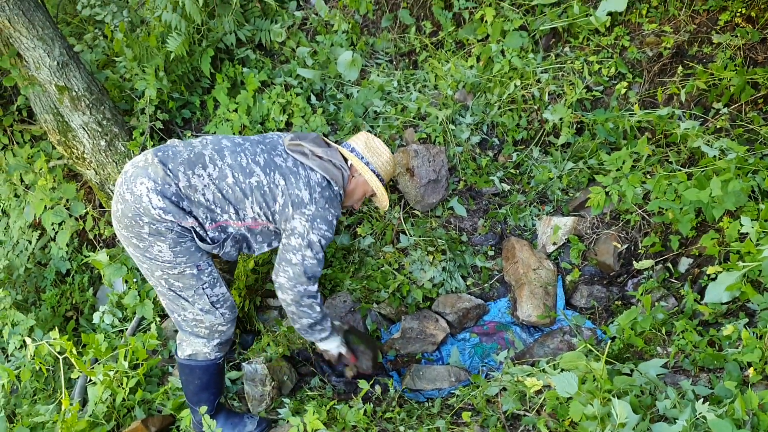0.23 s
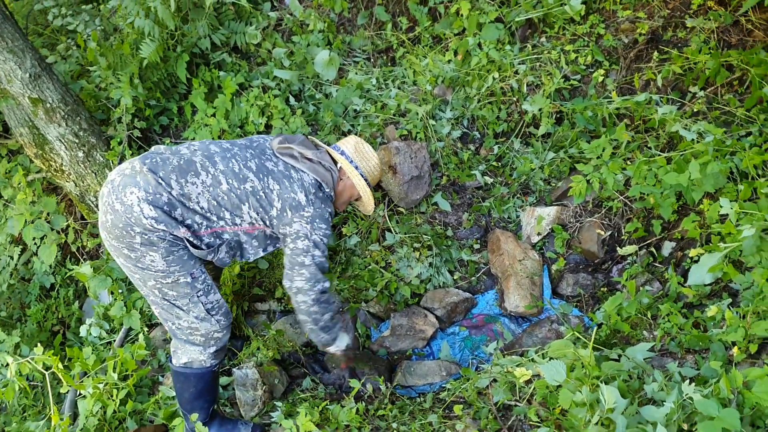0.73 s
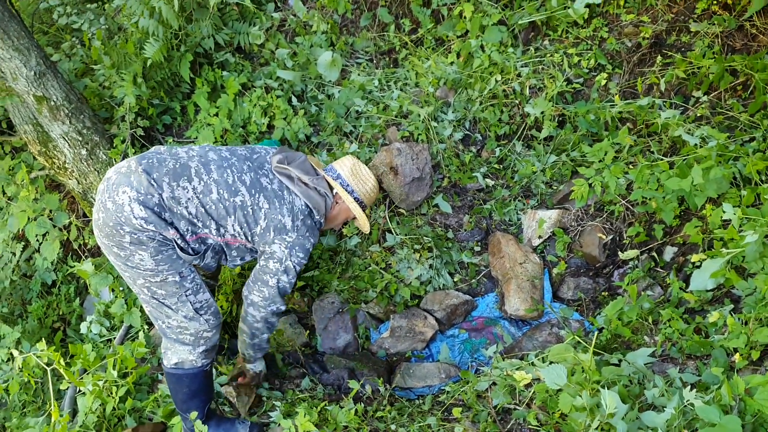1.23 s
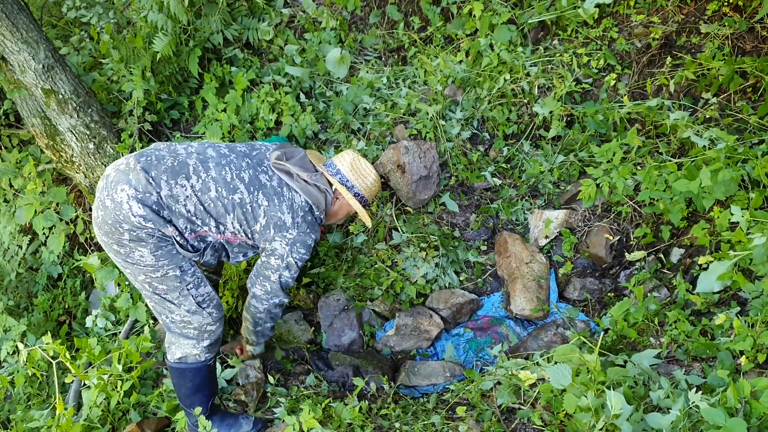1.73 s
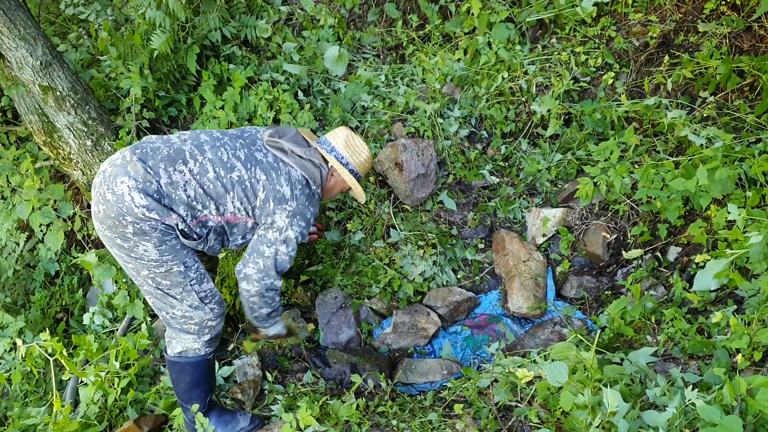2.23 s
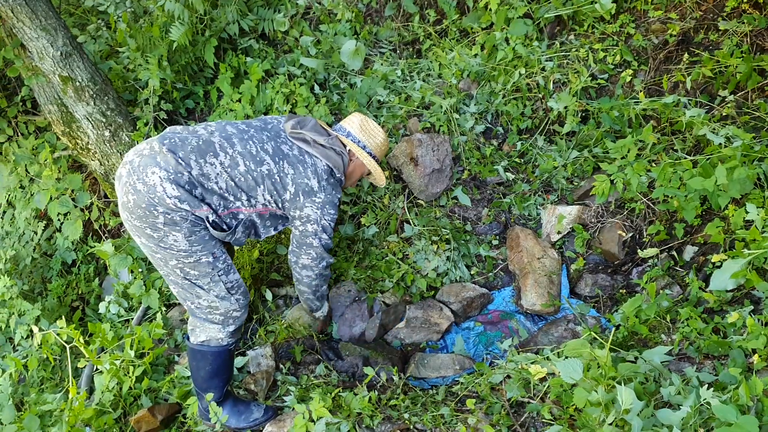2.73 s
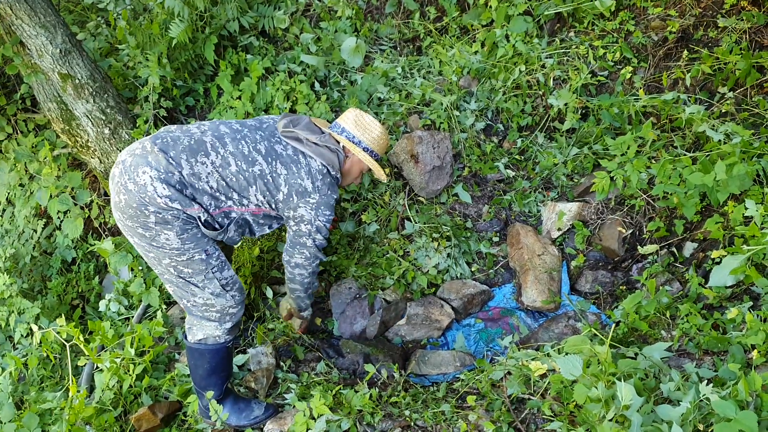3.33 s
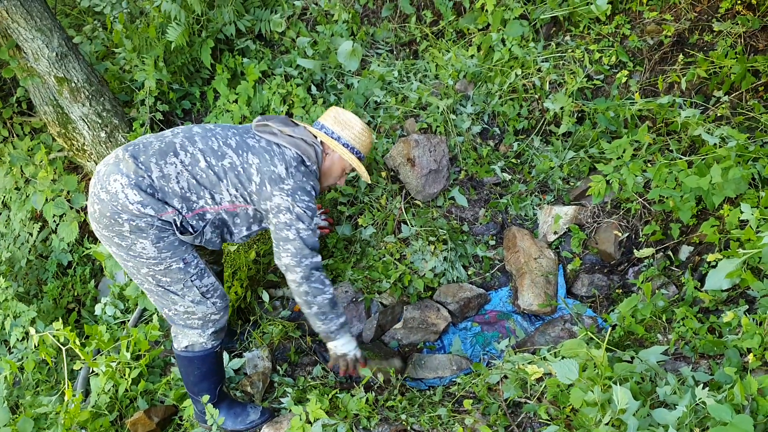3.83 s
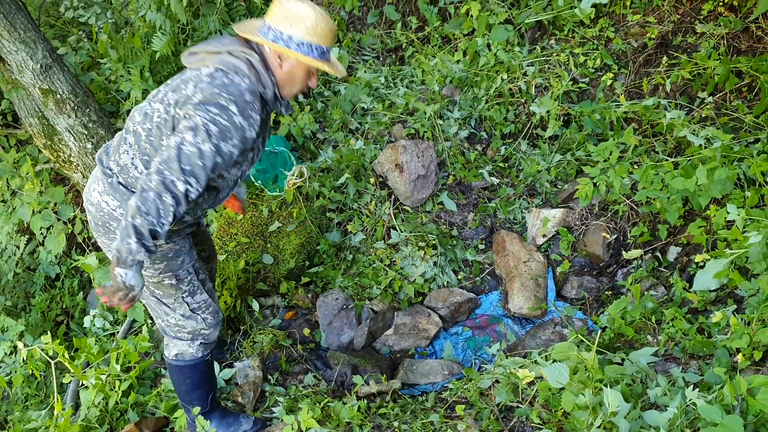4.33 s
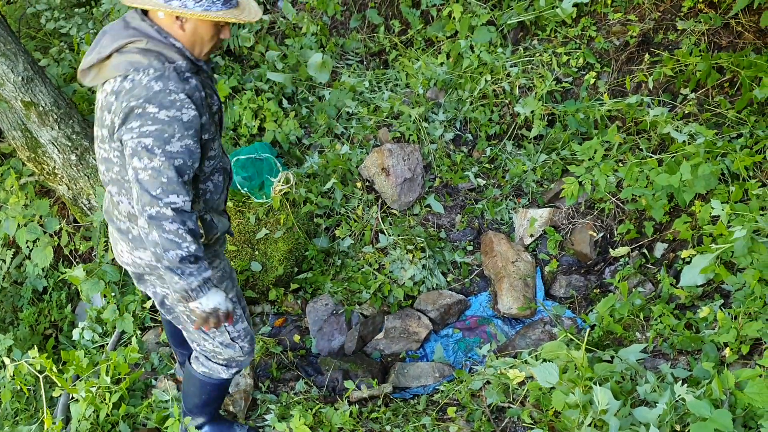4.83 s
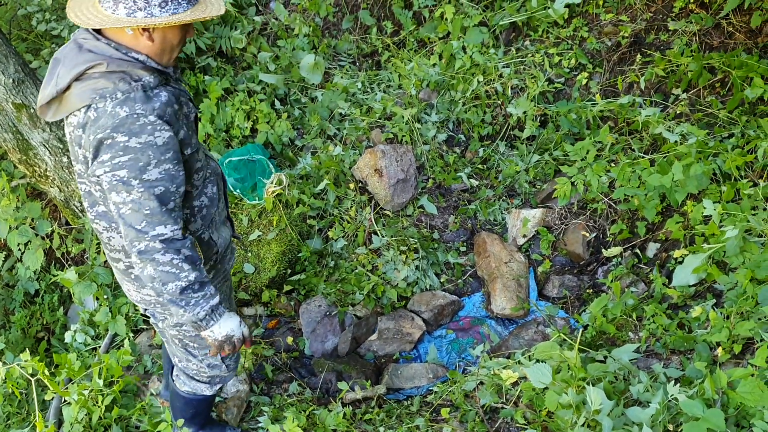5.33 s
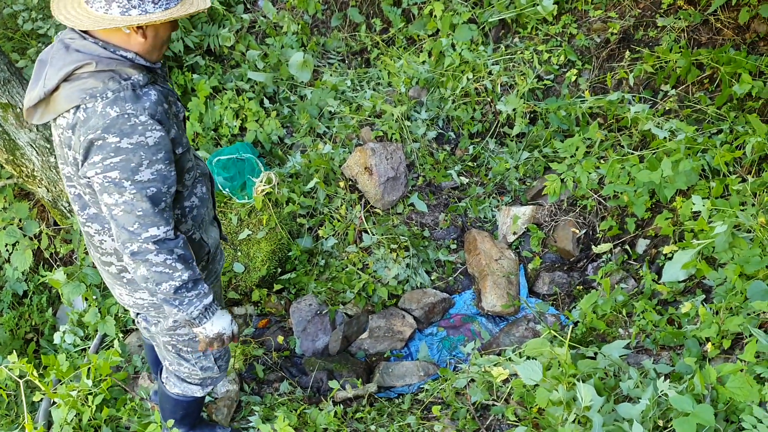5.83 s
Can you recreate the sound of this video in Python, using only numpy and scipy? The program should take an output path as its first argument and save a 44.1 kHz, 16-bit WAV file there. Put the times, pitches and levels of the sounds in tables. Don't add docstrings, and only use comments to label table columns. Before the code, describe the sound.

Stones being handled a few metres from a stereo microphone outdoors: a quick crunchy tumble, soft knocks with sleeves and leaves rustling, a loud bright stone-on-stone crack with a brief rattle, then a deeper double clunk into grit and earth. Afterwards it grows quieter, with faint movement and sparse light taps. Throughout, short piercing bird whistles come from the left, with distant engine rumble beneath.

```python
import sys
import numpy as np
from scipy import signal
from scipy.fft import rfft, irfft, next_fast_len
from scipy.io import wavfile
from scipy.ndimage import uniform_filter1d

SR = 44100
rng = np.random.default_rng(int(sys.argv[2]) if len(sys.argv) > 2 else 0)


def generate_wav(sig):
    pcm = np.round(np.clip(np.atleast_2d(sig).T, -1, 1) * 32767).astype(np.int16)
    wavfile.write(sys.argv[1], SR, pcm)


def undo_db(level):
    steps = np.asarray(level, float) / 20
    return 10 ** steps


N = 268789
T = np.arange(N) / SR
CRACK_S = 2.5719


def sides(pan_db):
    return undo_db(np.array([[.5], [-.5]]) * pan_db)


def unit(x):
    return x / np.sqrt(np.mean(x ** 2))


def highpass(x, order, hz):
    return signal.sosfilt(signal.butter(order, hz, "high", fs=SR, output="sos"), x)


def band(x, hz, width_hz):
    return signal.lfilter(*signal.iirpeak(hz, hz / width_hz, fs=SR), x)


def band_twice(x, hz, width_hz):
    return band(band(x, hz, width_hz), hz, width_hz)


def body(x, modes):
    return sum(undo_db(db) * band(x, hz, width_hz) for hz, width_hz, db in modes)


def decay(t, t60_s):
    return 1000. ** (-t / t60_s)


def ring(hz, t60_s, push_s):
    t = T[:SR // 6]
    push = np.hanning(int(push_s * SR) + 3)
    mode = np.sin(2 * np.pi * hz * t) * decay(t, t60_s)
    return np.convolve(mode, push / push.sum())[:len(t)]


def glide(hz):
    return 2 * np.pi * np.cumsum(hz) / SR


def add(out, s, sound):
    i = int(s * SR)
    out[..., i:i + sound.shape[-1]] += sound[..., :N - i]


def walk(rate_hz):
    k = int(SR / rate_hz)
    held = np.repeat(rng.standard_normal(N // k + 1), k)
    return 1.335 * uniform_filter1d(uniform_filter1d(held, k), k)[:N]


def swells(table, column):
    power = 0
    for row in table:
        angle = np.pi * np.clip((T - row[0]) / row[1] / 1.5, -.5, .5)
        power = power + undo_db(2 * row[column]) * np.cos(angle) ** 4
    return np.sqrt(power)


def grains(per_s, spread_db, shared):
    hit = rng.random((3, N)) < per_s / SR
    size = undo_db(spread_db * rng.exponential(size=(3, N))) * rng.standard_normal((3, N)) * hit
    return np.sqrt(shared) * size[0] + np.sqrt(1 - shared) * size[1:]


def wood(x, t60_s):
    t = T[:SR]
    tail = rng.standard_normal((2, SR)) * decay(t, t60_s) * np.clip(t / 0.0039, 0, 1)
    tail = tail / np.sqrt((tail ** 2).sum(axis=1, keepdims=True))
    return signal.fftconvolve(x.mean(axis=0)[None], tail, axes=1)[:, :N]


# frequency in Hz, level in dB per Hz.
AIR = [(18, -28.5), (30, -2.5), (71, -6.5), (120, -13), (249, -6.5), (341, -10), (518, -5.5), (747, -12.5),
       (1360, -15), (1910, -13.5), (3400, -25.5), (7650, -27), (8950, -42), (11900, -33), (15500, -33.5)]
# frequency in Hz, left-right correlation.
LIKENESS = [(60, 0.88), (130, 0.93), (290, 0.79), (640, 0.65), (1410, 0.33), (3100, 0), (6820, 0.19),
            (15000, 0.0)]
# frequency in Hz, left minus right in dB.
LEAN = [(60, -1.5), (110, -2), (200, -2.5), (380, 0.5), (700, -0.5), (1290, 1.5), (2380, 3.5), (4400, 4),
        (8120, 8), (15000, -1)]
AIR_DB, AIR_LAG_S = -55.5, .00038


def air():
    size = next_fast_len(N)
    octave = np.log2(np.maximum(np.arange(size // 2 + 1) * SR / size, 1))

    def read(table):
        hz, value = np.transpose(table)
        return np.interp(octave, np.log2(hz), value)

    mid, side = rfft(rng.standard_normal((2, size)))
    likeness = np.clip(read(LIKENESS), -.9, .99)
    side = np.sqrt(1 - likeness) * side * np.array([[1], [-1]])
    pair = undo_db(read(AIR)) * sides(read(LEAN)) * (np.sqrt(1 + likeness) * mid + side)
    pair = pair * np.exp(-2j * np.pi * 2 ** octave * AIR_LAG_S * np.array([[0], [1]]))
    out, swell = 0, walk(0.24)
    for centre in np.arange(4, 14.6, .5):
        share = np.clip(1 - 2 * np.abs(octave - centre), 0, 1)
        out = out + undo_db(0.41 * swell + walk(8.8)) * irfft(share * pair, size)[:, :N]
    return undo_db(AIR_DB) * unit(out)


# time in seconds, pitch in Hz, level in dB.
DRONE = [(0, 68.6, -66), (.25, 69.1, -68), (.5, 67.9, -70), (.65, 68.2, -63), (1.15, 68.1, -67),
         (1.7, 68, -62.5), (2.0, 67.7, -57), (2.45, 67.9, -55.5), (2.7, 68.1, -56.5), (3.3, 67.4, -62.5),
         (3.7, 68.4, -65), (4.05, 68.2, -64.5), (4.4, 67.9, -58), (4.75, 62.9, -62.5), (5.05, 68, -63),
         (5.31, 67.8, -55.5), (5.7, 63.1, -67.5), (6.09, 63, -71)]


def drone():
    s, hz, db = np.transpose(DRONE)
    line = np.sin(glide(np.interp(T, s, hz) * (1 + 0.0297 * walk(6.5))))
    return undo_db(np.interp(T, s, db) + 3.5 + 3.2 * walk(6.0)) * line


# middle in seconds, length in seconds, growl in dB, rumble in dB.
PASSES = [(.05, 0.39, -65.5, -65), (.8, 1, -70, -77), (1.4, 0.77, -72, -64), (2.35, 0.47, -61.5, -61),
          (2.75, 0.56, -62, -63), (3.3, 1, -63, -77), (4.6, 1, -63, -61), (5.3, 0.46, -60, -59),
          (5.75, 0.81, -65, -65)]
PASS_WAVER_DB = 2.5


def traffic():
    growl = unit(band_twice(rng.standard_normal(N), 261, 112))
    growl = swells(PASSES, column=2) * undo_db(PASS_WAVER_DB * walk(5.4)) * growl
    rumble = unit(band_twice(rng.standard_normal(N), 41, 30))
    rumble = swells(PASSES, column=3) * undo_db(PASS_WAVER_DB * walk(6.9)) * rumble
    return growl + rumble


# time in seconds, pitch in Hz, level in dB.
SLURS = [
    [(2.09, 4060, -88), (2.15, 4030, -75), (2.25, 3890, -70), (2.305, 3795, -67), (2.335, 3830, -62),
     (2.36, 3930, -70), (2.385, 3900, -77), (2.42, 3850, -86)],
    [(3.47, 4420, -88), (3.50, 4400, -71), (3.55, 4400, -71), (3.6, 4400, -76), (3.64, 4330, -88),
     (3.67, 4280, -71), (3.71, 4115, -75), (3.76, 4100, -73), (3.79, 4050, -86)],
    [(4.46, 5050, -80), (4.47, 4950, -66), (4.485, 4750, -68), (4.497, 4800, -68), (4.51, 4850, -85)],
]
SLUR_OVERTONE_DB = [-7, -17, -30]


def far_bird():
    out = np.zeros((2, N))
    for slur, over_db in zip(SLURS, SLUR_OVERTONE_DB):
        s, hz, db = np.transpose(slur)
        phase = glide(np.interp(T, s, hz))
        size = undo_db(np.interp(T, s, db) + 1.5 * walk(29.9)) * (T > s[0]) * (T < s[-1])
        out += sides(3.0) * size * (np.sin(phase) + undo_db(over_db) * np.sin(2 * phase))
    return out


# start in seconds, level in dB, start pitch in Hz, fall in percent of pitch,
# place of the hook as share of length.
WHISTLES = [(.03, -73, 5180, 1.6, .6), (.444, -56, 5164, 2.57, 0.695), (.660, -64, 5060, 1.76, 0.36),
            (.705, -63, 5040, 1, .3), (1.456, -57.5, 5120, 5, 0.56), (1.945, -60, 5050, 1.9, 0.22),
            (2.238, -55.5, 5160, 2.5, 0.7), (2.977, -56.5, 5153, 3, 0.72), (3.458, -63, 5040, 1.45, 0.27),
            (3.673, -57, 5145, 2.9, 0.65), (4.446, -56.5, 5155, 2.34, 0.64),
            (4.995, -67.5, 5090, 1.6, 0.44), (5.176, -56.5, 5150, 2.7, 0.65),
            (5.915, -55.5, 5157, 4.4, 0.66)]
WHISTLE_S, WHISTLE_PAN_DB, WAVER_DB = .09, 14.5, 2.5


def near_bird():
    out = np.zeros((2, N))
    u = T[:int(WHISTLE_S * SR)] / WHISTLE_S
    swell = np.sin(np.pi * u ** 1.6) ** 0.5
    for s, db, hz, fall, hook in WHISTLES:
        drop = 0.047 * u + 0.927 / (1 + np.exp((hook - u) / 0.075))
        pitch = hz - 20 + 50 * np.sin(np.pi * u) - fall * hz / 100 * drop
        add(out, s - .002, undo_db(db + 2.5) * sides(WHISTLE_PAN_DB) * swell * np.sin(glide(pitch)))
    return out * undo_db(WAVER_DB * walk(70))


# middle in seconds, length in seconds, bright part in dB,
# dull part in dB.
STROKES = [(.13, 0.25, -79, -78), (.31, 0.14, -66, -62), (.43, 0.15, -67, -62.5), (.65, 0.29, -86, -74),
           (1.07, 0.16, -79, -70), (1.175, 0.085, -66, -65), (1.275, 0.094, -62, -67),
           (1.36, 0.13, -62, -63.5), (1.46, 0.13, -75, -69), (1.69, 0.094, -74, -73), (1.72, .06, -64, -66),
           (1.745, .05, -61, -67), (1.782, .03, -62, -70), (1.82, 0.19, -66, -73), (2.06, 0.2, -71.5, -76),
           (2.21, .15, -75, -83), (2.31, 0.073, -63, -63), (2.54, 0.14, -71, -73), (3.2, 0.24, -79, -75),
           (3.4, 0.15, -68.5, -70), (3.49, 0.096, -59, -67), (3.72, .12, -75, -80), (3.94, .14, -70, -66),
           (4.35, 0.17, -88, -78), (4.7, 0.17, -90, -89), (4.93, 0.19, -76, -75), (5.08, .2, -78, -73),
           (5.225, .15, -65, -68), (5.32, 0.14, -69, -65.5), (5.37, 0.13, -68, -67), (5.46, .12, -80, -74),
           (5.55, 0.13, -85, -90), (5.94, 0.18, -74, -73.5)]
STIR_DB, STIR_DULL_DB = -83.5, -80


def rustle():
    stroke = undo_db(2.1 * walk(55) + .6 * walk(140))
    bright = unit(band(band(grains(9000, 2.7, 0.19), 13900, 6920), 11000, 9000))
    leaves = band(grains(6000, 2.83, 0.092), 6300, 3970)
    cloth = band(grains(4000, 2.67, 0.34), 1900, 2390)
    dull = undo_db(4.0) * unit(leaves + 1.83 * cloth)
    bright = (swells(STROKES, column=2) + undo_db(STIR_DB)) * bright
    dull = (swells(STROKES, column=3) + undo_db(STIR_DULL_DB)) * dull
    return stroke * sides(1.4) * (bright + dull)


# start in seconds, level in dB, centre in Hz, width in Hz,
# t60 in seconds.
CHIP = [(2.608, -40, 3150, 400, .13), (5.27, -61, 3300, 300, .12), (5.885, -62, 5550, 250, .14),
        (1.07, -60, 6000, 400, .15), (1.43, -63, 5900, 300, .08), (1.70, -59, 2700, 300, .15),
        (1.975, -62, 6100, 500, .12)]


def chips():
    out = np.zeros((2, N))
    t = T[:SR // 3]
    for s, db, hz, width_hz, t60_s in CHIP:
        chatter = unit(band_twice(rng.standard_normal((2, len(t))), hz, width_hz))
        add(out, s, undo_db(db) * np.clip(t / 0.0027, 0, 1) * decay(t, t60_s) * chatter)
    return out


# start in seconds, length in seconds, level in dB,
# dying t60 in seconds, treble in dB.
GRIT = [(.3336, 0.0051, -38.5, 0.025, -2), (.343, 0.024, -39.5, 0.02, -6.5),
        (.3655, 0.0078, -41, 0.087, -0.5), (2.575, 0.0066, -38.5, 0.039, -20),
        (2.585, 0.012, -41, 0.05, -3), (2.567, .003, -50, .0081, -27), (2.609, 0.0077, -48, .1, -18),
        (3.860, 0.021, -37, 0.082, -5.5), (2.7, 0.013, -57, 0.041, -2.5), (1.5, .022, -76, .1, -8)]
# centre in Hz, width in Hz, level in dB.
GRIT_BODY = [(800, 940, -0.5), (1640, 520, -2.5), (2800, 1380, -6.5)]
# centre in Hz, width in Hz, level in dB.
GRIT_TREBLE = [(5500, 6600, 0.5), (12500, 7400, -4)]
GRIT_PER_S = 5000


def grit():
    low, high = np.zeros(N), np.zeros(N)
    for s, length_s, db, t60_s, treble_db in GRIT:
        dying = decay(np.clip(T - s - length_s, 0, 1), t60_s)
        shape = undo_db(db) * np.clip((T - s) / 0.00066, 0, 1) * dying
        low += shape
        high += undo_db(treble_db) * shape
    dull = band(body(grains(GRIT_PER_S, 1.4, 0.79), GRIT_BODY), 1340, 2470)
    bright = body(grains(2 * GRIT_PER_S, 1.5, 0.37), GRIT_TREBLE)
    return low * unit(dull) + high * unit(bright)


# start in seconds, level in dB, pitch in Hz, t60 in seconds,
# left minus right in dB.
TICKS = [(0.333, -31, 2010, .008, 1), (0.3362, -34, 4330, .005, 0), (.3372, -32, 1000, .012, -2),
         (.3433, -33, 1600, .01, 2), (0.348, -34, 1610, .03, 0), (.3535, -32, 1660, .025, 0),
         (0.36, -28, 3000, .008, 0), (0.365, -31, 890, .01, 0), (.3693, -36, 2200, .008, 2),
         (0.3725, -38, 3300, .008, 0), (1.318, -48, 720, .04, 0), (1.327, -48, 900, .03, 0),
         (1.165, -50, 1600, .03, 0), (3.8725, -32, 1500, .01, 0), (3.8755, -31, 400, .015, 0),
         (3.8805, -39, 6100, .04, 0), (.3385, -35, 2400, .008, 0), (0.414, -44, 4300, .008, 0),
         (.4235, -47, 4000, .005, 0), (.4240, -47, 6600, .005, 0), (2.302, -45, 3460, .015, 0),
         (2.305, -49, 4200, .015, 0), (2.5815, -36, 5500, .006, 4), (2.5865, -33, 2920, .01, 1.5),
         (2.5885, -34.5, 5000, .008, 0), (2.5912, -30, 4500, .01, 0), (2.5985, -36, 6500, .005, 1),
         (2.601, -26, 2000, .008, 1), (2.6041, -24, 1130, .01, 2), (2.6115, -32, 1500, .008, 0),
         (3.8605, -32, 1200, .01, 0), (3.8637, -27, 2800, .006, 0), (3.8681, -35.5, 450, .015, 2),
         (3.8775, -38, 2520, .008, 0), (3.8833, -28, 3800, .006, 0), (3.8892, -32, 900, .01, 0)]


def ticks():
    out = np.zeros((2, N))
    for s, db, hz, t60_s, pan_db in TICKS:
        add(out, s, -undo_db(db) * sides(pan_db) * ring(hz, t60_s, 0.35 / hz))
    return out


# start in seconds, level in dB, pitch in Hz, t60 in seconds.
SOIL = [(.338, -44, 190, .09), (.358, -44, 200, .06), (.372, -43, 100, .09), (.3735, -37, 165, .11),
        (.377, -39, 240, .06), (1.260, -42, 170, .09), (1.404, -46, 150, .07), (1.80, -50, 140, .08),
        (2.291, -55, 270, .09), (2.471, -53, 265, .11), (2.574, -46, 170, .07), (3.865, -30, 220, .05),
        (3.8745, -32, 86, .1), (3.8795, -29, 150, .06), (3.881, -34, 260, .04), (3.886, -31, 72, .12),
        (5.385, -52, 135, .1)]


def soil():
    out = np.zeros((2, N))
    for s, db, hz, t60_s in SOIL:
        add(out, s, -undo_db(db) * sides(-1.63) * ring(hz, t60_s, 0.0021))
    return out


# start in seconds, peak in dB, ring in Hz, snap in dB, snap in Hz.
KNOCKS = [(0.336, -34, 910, -2, 5000), (0.346, -31, 2520, -1, 4500), (0.3666, -23.5, 2460, -5, 7260),
          (0.3707, -25.5, 455, -25, 5000), (.421, -43, 605, -8, 4300), (1.198, -48, 600, -16, 5000),
          (1.2578, -31, 800, -28, 5000), (1.2928, -46, 2196, -2, 11000), (1.3133, -49, 765, -20, 5000),
          (1.4015, -36.5, 990, -25, 5000), (1.793, -48, 725, -18, 6000), (1.82, -45.5, 1310, -20, 6000),
          (2.303, -50.5, 1900, 8, 3380), (2.6059, -16.5, 1140, -32, 5000), (2.8498, -48, 497, -21, 5000),
          (3.8647, -20.5, 1157, -6.5, 3517), (3.8808, -17, 557, -6.5, 5740),
          (3.8826, -20.5, 1170, -4, 2600), (3.901, -41, 1500, -10, 4500), (4.5975, -44.5, 500, -16, 4995),
          (5.278, -44, 527, -28, 5010), (5.3809, -42.5, 888, -12, 6000), (5.955, -41.5, 885, -10, 6000),
          (3.887, -28.5, 593, -15, 3000)]
# multiple of ring pitch, level in dB, multiple of t60.
KNOCK_SHAPE = [(1.014, 1.5, 1.1), (1.24, 2.5, 0.24), (2.28, -4, 0.56), (0.636, -2.5, 1)]
KNOCK_T60_S, KNOCK_DAMPING = 0.017, .4


def knocks():
    out = np.zeros((2, N))
    for s, db, hz, snap_db, snap_hz in KNOCKS:
        t60_s = KNOCK_T60_S * (1000 / hz) ** KNOCK_DAMPING
        tone = 0
        for ratio, mode_db, longer in KNOCK_SHAPE:
            detune = 1 + 0.06 * rng.standard_normal()
            gain = undo_db(mode_db + 2.0 * rng.standard_normal((2, 1)))
            tone = tone + gain * ring(hz * ratio * detune, t60_s * longer, 0.4 / hz)
        snap = undo_db(snap_db + 7.0) * ring(snap_hz, 0.0027, 0)
        add(out, s, -undo_db(db - 4.5) * sides(0.92) * (tone + snap))
    return out


# pitch in Hz, level in dB, t60 in seconds,
# left minus right in dB.
CRACK = [(643, -18, 0.039, 3), (1200, -5.5, 0.028, -1.5), (1690, -10.5, 0.019, -8), (1944, -8, 0.024, 1.5),
         (2790, -14, 0.021, 8), (3130, -18, 0.032, -9), (3190, -38, 0.12, 5)]
CRACK_DB, CRACK_PUSH_S, PORT_LAG_S = -3, .0003, .00005
CRACK_BASS_HZ = 1000


def crack():
    out = np.zeros((2, N))
    for hz, db, t60_s, pan_db in CRACK:
        for port, gain, lag_s in zip(out, sides(pan_db), (0, PORT_LAG_S)):
            add(port, CRACK_S + lag_s, -undo_db(CRACK_DB + db) * gain * ring(hz, t60_s, CRACK_PUSH_S))
    return highpass(out, 1, CRACK_BASS_HZ)


# pitch in Hz, level in dB, spread in seconds,
# left minus right in dB, right port lag in seconds.
CONTACT = [(2150, -6.5, 0.00028, 7, .00002), (5870, -21, 0.00016, -30, .00001),
           (9530, -25.5, .0002, -30, .000065)]


def contact():
    out = np.zeros((2, N))
    for hz, db, spread_s, pan_db, late_s in CONTACT:
        t = T - CRACK_S - .00039 - late_s * np.array([[0], [1]])
        out += undo_db(db) * sides(pan_db) * np.sin(2 * np.pi * hz * t) * np.exp(-.5 * (t / spread_s) ** 2)
    return out


WOOD_T60_S, STONE_WET_DB = 0.47, -27
BIRD_T60_S, BIRD_WET_DB = .85, -2


def scene():
    background = air() + sides(-1.9) * (drone() + traffic())
    song = far_bird() + near_bird()
    stones = highpass(knocks() + crack(), 2, 380) + contact()
    near = chips() + grit() + ticks() + soil() + stones
    wash = undo_db(STONE_WET_DB) * wood(near, WOOD_T60_S) + undo_db(BIRD_WET_DB) * wood(song, BIRD_T60_S)
    return background + song + rustle() + near + wash


def top_cut(x):
    return signal.sosfilt(signal.butter(12, 16800, fs=SR, output="sos"), x)


DUCK_DB, DUCK_S, TOP_HZ = 4, 0.91, 15800


def record(dry):
    since = T - CRACK_S - .03
    x = dry * undo_db(-DUCK_DB * (since > 0) * np.exp(-np.abs(since) / DUCK_S))
    x = x - 0.39 * band(x, 9240, 1900)
    x = highpass(x, 2, 30)
    x = signal.sosfilt(signal.ellip(8, .2, 45, TOP_HZ, fs=SR, output="sos"), x)
    return top_cut(x)


dry = scene()
out = record(dry)
generate_wav(out)
```